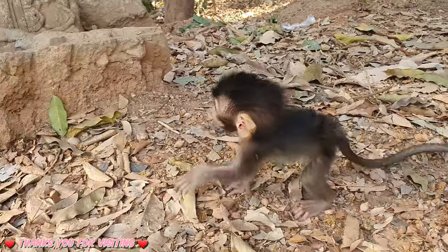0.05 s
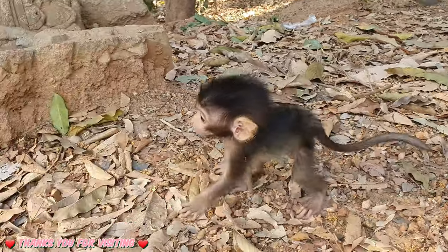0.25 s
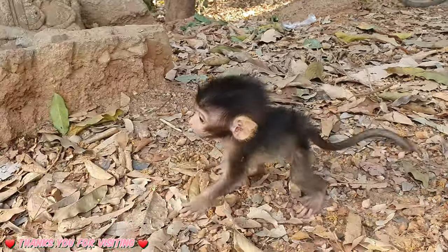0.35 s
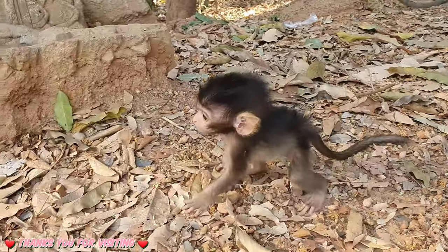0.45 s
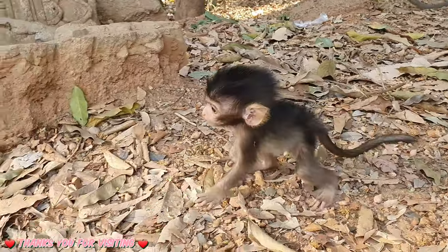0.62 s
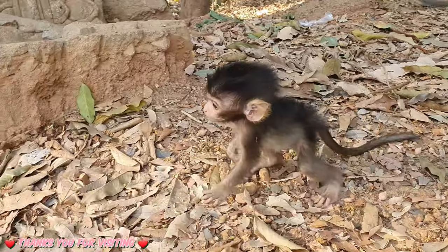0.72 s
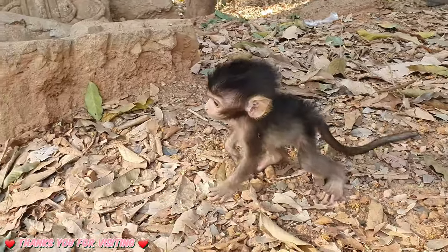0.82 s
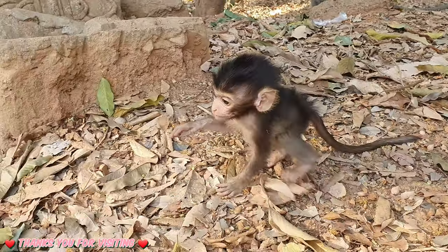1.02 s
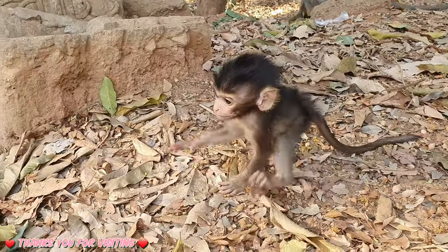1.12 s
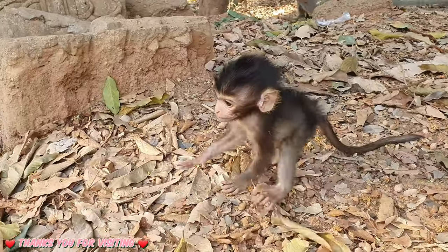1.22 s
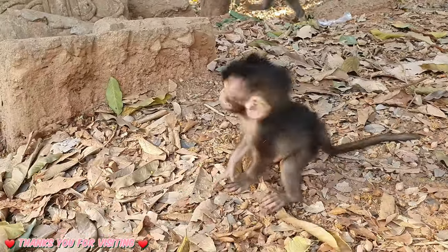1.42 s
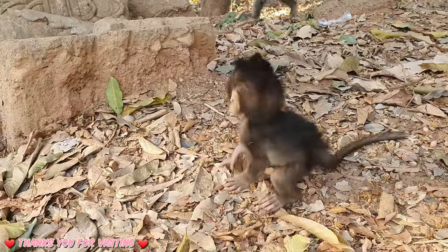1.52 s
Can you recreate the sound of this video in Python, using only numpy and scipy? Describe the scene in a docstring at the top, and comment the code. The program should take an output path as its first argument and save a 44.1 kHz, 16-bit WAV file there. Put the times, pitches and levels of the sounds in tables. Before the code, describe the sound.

Dry fallen leaves crunch close by as a small monkey scampers across them, lands with a louder crackle, then shuffles softly. Behind it are a faint outdoor hush and a slight rumble of air on the microphones.

```python
"""Baby monkey on dry leaves

Outdoors, a baby monkey scampers over fallen leaves, lands in one louder crunch, then shuffles lightly.
Each press of a paw breaks and rubs leaves in a dense shower of tiny cracks, with a few sharper snaps.
Air buffets the spaced microphone pair over a faint hush; the leaves lie nearer the left microphone."""
import sys
import numpy as np
from scipy import signal
from scipy.fft import rfft, irfft, next_fast_len
from scipy.io import wavfile

SR = 44100
rng = np.random.default_rng(int(sys.argv[2]) if len(sys.argv) > 2 else 0)


def to_wav(s):
    """Save 16-bit WAV."""
    ch = np.atleast_2d(s).T  # columns
    pcm = np.round(np.clip(ch, -1, 1) * 32767)  # PCM
    wavfile.write(sys.argv[1], SR, pcm.astype(np.int16))


N = 68355
T = np.arange(N) / SR

# paws pressing and dragging leaves: peak t/s, relative level/dB, rise/s, fall/s,
# low body/dB, mid weight/dB, papery upper mids/dB, leaf ring f/Hz, ring height/dB
PRESSES = [(0.084, -67.5, 0.0097, 0.0096, 0, 12, 4, 1035, 28),
           (.14, -69, 0.05, 0.047, 24, 19.5, 2, 1030, 12), (0.218, -34, 0.0058, 0.0067, -2, 0, 3, 1300, 5),
           (0.2301, -31.5, 0.0074, 0.0019, -8, 1, -1.5, 1980, 12.5),
           (0.292, -31, 0.018, 0.013, -8, 6, 3.5, 3670, 2),
           (.318, -31, 0.021, 0.027, -1.5, -0.5, 4, 1910, 11),
           (.399, -23.5, 0.023, 0.017, 0.5, 3.5, 4, 2070, 5),
           (0.446, -25, 0.01, 0.0115, 2.5, -3, 5.5, 1830, 13.5),
           (0.466, -31, 0.018, 0.037, -7.5, 1, 1.5, 2000, 5),
           (.535, -27.5, 0.03, 0.016, -4, -1.5, -0.5, 3500, 3),
           (0.597, -34, 0.035, 0.012, -9, 1, 4, 2530, 7), (0.628, -40.5, 0.14, 0.11, -1.5, 3.5, 2, 2500, 6),
           (0.717, -27.5, 0.0095, 0.031, -5, -4.5, -2, 2130, 12),
           (0.738, -26.5, 0.0031, 0.02, -2.5, -4, 3.5, 1160, 9),
           (0.77, -35, 0.025, 0.031, 2, 7, 5.5, 4200, -3.5), (.869, -47.5, .049, 0.094, -8, 6, .5, 1700, 6),
           (.935, -45, 0.033, 0.017, 4.5, 0.5, 7.5, 4600, 2),
           (1.079, -42, 0.0092, .008, -20, -6, 0, 4570, 10.5),
           (1.139, -43.5, 0.012, 0.021, 6, -4.5, 4, 2540, 12.5),
           (1.21, -47, 0.041, 0.015, 3, 1.5, 0.5, 4460, 6),
           (1.326, -51.5, 0.074, 0.054, 8.5, -4, 2, 4150, 3),
           (1.447, -51.5, 0.031, 0.041, 8, -3.5, 2, 2460, 9)]


def from_db(db):
    """Decibels to gain."""
    return 10 ** (np.asarray(db) / 20)


def unit_rms(x):
    """Scale to unit level."""
    return x / np.sqrt(np.mean(x ** 2) + 1e-20)


def in_time(rows):
    """A control curve at every sample."""
    return np.interp(T, *np.transpose(rows))


def wander(per_s):
    """A random curve gliding to a new value per_s times a second."""
    return np.interp(T * per_s, np.arange(1000), rng.standard_normal(1000))


def bands(colour):
    """Filter bank for a spectrum of unit power: (centre Hz, filter, gain) per band."""
    edges = np.r_[np.geomspace(22, 1400, 12, endpoint=False), np.geomspace(1400, 17000, 19)]
    centres = np.sqrt(edges[1:] * edges[:-1])
    hz, db = np.transpose(colour)
    gains = from_db(np.interp(np.log(centres), np.log(hz), db))
    gains /= np.sqrt(np.sum(gains ** 2 * np.diff(edges)) * 2 / SR)
    filters = [signal.butter(2, band, "band", fs=SR, output="sos") for band in zip(edges, edges[1:])]
    return zip(centres, filters, gains)


def noise(colour, likeness):
    """Coloured stereo noise of unit level; likeness is the correlation between the microphones."""
    out = 0
    for _, sos, gain in bands(colour):
        out += gain * signal.sosfilt(sos, rng.standard_normal((2, N + SR // 10)))[:, -N:]
    mid, side = out
    return unit_rms(np.sqrt(1 + likeness) * mid + np.sqrt(1 - likeness) * side * [[1], [-1]])


def hush():
    """The faint, smooth outdoor bed."""
    # spectrum of the hush: f/Hz, relative density/dB
    colour = [(60, 7.5), (170, -30), (280, 0), (400, 1.5), (600, 1.5), (850, -21.5), (1200, -8),
              (1700, -10), (2400, -7), (4000, -13), (5600, -12.5), (8000, -19), (12000, -7.5), (16000, -19)]
    # its slow drift: t/s, level/dB
    drift = [(0, -58.5), (.4, -59.5), (1.55, -57)]
    return from_db(in_time(drift)) * noise(colour, likeness=0.31)


def buffeting():
    """Air on the microphones: a lumpy low rumble, unrelated at the two and stronger on the right."""
    # gusts at the left microphone: t/s, level/dB
    gusts = [(0, -66.5), (.09, -56), (.19, -53.5), (.28, -57.5), (.40, -58), (.46, -44.5), (.51, -51.5),
             (.61, -45.5), (.67, -55), (.71, -51), (.77, -53.5), (.92, -53.5), (1.04, -54.5), (1.08, -55),
             (1.13, -56.5), (1.27, -52.5), (1.36, -51.5), (1.415, -57.5), (1.45, -52.5), (1.55, -54.5)]
    # spectrum of the rumble: f/Hz, relative density/dB
    colour = [(25, -23.5), (50, -5), (90, -3), (140, -11), (250, -13.5), (500, -34), (1000, -36)]
    return from_db(in_time(gusts)) * noise(colour, likeness=0) * from_db([[0], [6]])


def bumps():
    """Dull, brief thumps right at the microphones, a quarter cycle apart at the two."""
    # low thumps: t/s, relative level/dB, f/Hz, half-width/s
    thumps = [(0.362, -35, 71, 0.0083), (.452, -29.5, 148, 0.0021), (0.557, -30, 54, 0.013),
              (0.602, -29, 88, 0.0077), (0.62, -35, 55, 0.013), (0.758, -41, 59, 0.017),
              (0.847, -40.5, 48, 0.026), (1.003, -45.5, 94, 0.023), (1.153, -36.5, 87, 0.0079),
              (1.186, -32, 61, 0.0029), (1.238, -40.5, 63.4, 0.017), (1.267, -45, 60, 0.012),
              (1.376, -35, 140, 0.0045), (1.461, -35.5, 89, 0.011), (1.534, -45.5, 79.4, 0.062)]
    s, db, hz, width = np.transpose(thumps)[:, :, None]
    cycles = hz * (T - s) + rng.random((len(thumps), 1))
    swell = from_db(db) * np.exp(-((T - s) / width) ** 2)
    pair = [(swell * np.sin(2 * np.pi * cycles + shift)).sum(axis=0) for shift in (0, np.pi / 2)]
    return np.array(pair) * from_db([[-1.8], [1.8]])


def scatter(x, t60_s):
    """Earth bank and trees return a dying cloud of small reflections, different at each microphone."""
    t = T[:SR // 2]
    cloud = rng.standard_normal((2, len(t))) * from_db(-60 * t / t60_s)
    cloud /= np.sqrt(np.sum(cloud ** 2, axis=1, keepdims=True))
    return signal.fftconvolve(x, cloud, axes=1)[:, :N]


def spaced_pair(x):
    """Each crack comes from its own spot and reaches the right microphone later, a little louder."""
    # how much sooner the leaves reach the left microphone: t/s, lead/ms
    lead = [(.3, .487), (.46, .485), (.74, .46), (1.1, .465)]
    spread_ms, right_db = 0.011, 0.6
    lag_ms = np.abs(in_time(lead) + spread_ms * rng.standard_normal(N))
    arrival = np.arange(N) + np.round(lag_ms * SR / 1000).astype(int)
    right = from_db(right_db) * np.bincount(arrival, x)[:N]
    return np.array([x, right]) + 1e-18


def round_the_case(pair):
    """Bending round the recorder's case shifts the phase of each frequency at the right microphone."""
    # extra lag on the right: f/Hz, phase/rad
    case_shift = [(100, -0.37), (500, -1.06), (1000, -0.74), (1800, -0.82), (2500, -0.55), (3000, 0.61),
                  (4200, 0.51), (6300, -1.6), (9000, 0.12), (12000, -0.36), (15000, 0.53)]
    size = next_fast_len(N + SR // 10)
    shift = np.interp(np.arange(size // 2 + 1) * SR / size, *np.transpose(case_shift))
    right = irfft(rfft(pair[1], size) * np.exp(-1j * shift), size)[:N]
    return np.array([pair[0], right])


def snaps():
    """A brittle leaf breaks in about a millisecond: a broad crack with a high ring."""
    # single leaves snapping: t/s, relative level/dB, ring f/Hz
    breaks = [(0.21, -43, 14000), (0.2176, -45, 11700), (0.2291, -27.5, 12200), (.2560, -27.5, 12100),
              (0.2873, -42, 12400), (0.2936, -40, 12300), (0.357, -35, 12100), (0.36, -35, 12100),
              (.3789, -43, 12400), (0.3896, -25, 12200), (0.443, -21, 11900), (0.4507, -20, 10000),
              (0.469, -32, 11900), (.5266, -40, 13000), (0.5365, -24, 14000), (0.584, -28.5, 13000),
              (0.595, -31, 13000), (0.601, -25, 13200), (0.7202, -28, 11000), (0.7383, -21, 13000),
              (0.7481, -27, 11100), (0.7647, -31, 12200), (0.774, -38, 12500), (0.8089, -32, 12200),
              (0.948, -45, 4300), (.9780, -37, 12000), (1.0561, -37.5, 11700), (1.0745, -33.5, 11200),
              (1.0779, -41.5, 4500), (1.0840, -48, 4520), (1.1340, -37, 12100), (1.14, -39, 2760),
              (1.191, -39, 12000), (1.219, -38.5, 11900)]
    decay_s, ring_width_hz, crack_db = 0.00094, 2000, -3.5
    low_cut = signal.butter(2, 1500, "high", fs=SR, output="sos")
    out = 0
    for s, db, hz in breaks:
        tear = spaced_pair((T >= s) * np.exp(-np.abs(T - s) / decay_s) * rng.choice([-1, 1], N))
        resonance = signal.iirpeak(hz, hz / ring_width_hz, fs=SR)
        ring = np.sqrt(SR / (np.pi * ring_width_hz)) * signal.lfilter(*resonance, tear)
        crack = from_db(crack_db) * signal.sosfilt(low_cut, tear)
        out += from_db(db) * (ring + crack)
    return out


def paws():
    """Each press swells and dies away; gives the joint level and each press's share of the power."""
    s, db, rise, fall = np.transpose(PRESSES)[:4, :, None]
    swell = np.exp(-np.where(T < s, (s - T) / rise, (T - s) / fall))
    power = (from_db(db) * swell) ** 2 + 1e-18
    total = power.sum(axis=0)
    return np.sqrt(total), power / total


def press_colour(hz):
    """How much each press favours this frequency, in dB against the top sizzle."""
    ranges_hz = [640, 1680, 4220, 11000]   # body, weight, paper, sizzle
    return np.array([np.interp(np.log(hz), np.log(ranges_hz), [*press[4:7], 0]) for press in PRESSES])


def leaf_ring(shares):
    """The ring follows the pressing paw and strays as the leaves bend: pitch in Hz, height in dB."""
    hz, db = np.transpose(PRESSES)[7:]
    stray_octaves = 0.12 * wander(per_s=66)
    return 2 ** (np.log2(hz) @ shares + stray_octaves), db @ shares


def cracking(level):
    """Leaves crack faster and harder under pressure: a shower of clicks of uneven size."""
    full_press_db, full_cracks_per_s = -28, 5000
    rate = full_cracks_per_s * (level / from_db(full_press_db)) ** 0.45
    chance = np.minimum(rate / SR, 1)
    sizes = unit_rms(from_db(np.minimum(rng.exponential(1, N), 3.5)))
    return (rng.random(N) < chance) * sizes * level / np.sqrt(chance) * from_db(-1)


def litter_shiver(cracks, t60_s):
    """Each crack briefly shakes the neighbouring leaves; gives the envelope of that shiver."""
    decay = from_db(-120 / (t60_s * SR))   # power left after one sample
    return np.sqrt(signal.lfilter([1 - decay], [1, -decay], cracks ** 2 + 1e-18))


def leaves():
    """The crunch under the paws: cracks and their shiver, coloured by each press and each leaf."""
    # spectrum of breaking leaves: f/Hz, relative density/dB
    spectrum = [(150, -12), (240, -5), (400, -13), (700, -4), (1000, -16), (1300, -7), (1700, -9.5),
                (2300, -7.5), (2900, -11.5), (3600, -8.5), (4400, -10.5), (5200, -9.5), (6700, -9),
                (8100, -11), (9800, -5), (11900, 3), (14000, -2.5), (15800, -2.5)]
    crack_spread_db, ring_half_width_octaves = 3.5, 0.16
    level, shares = paws()
    cracks = cracking(level)
    shiver = from_db(-5) * litter_shiver(cracks, t60_s=0.012)
    ring_hz, ring_height_db = leaf_ring(shares)
    out = np.zeros((2, N))
    for hz, sos, gain in bands(spectrum):
        crack_gains = unit_rms(from_db(crack_spread_db * rng.standard_normal(N)))
        crack_gains *= rng.choice([-1, 1], N)
        ring_db = ring_height_db * np.exp(-(np.log2(hz / ring_hz) / ring_half_width_octaves) ** 2)
        leaf_db = 3.5 * wander(per_s=70)   # the colour changes from leaf to leaf
        colour = from_db(press_colour(hz) @ shares + ring_db + leaf_db)
        crunch = cracks * crack_gains + shiver * rng.standard_normal(N)
        out += gain * signal.sosfilt(sos, spaced_pair(crunch * colour))
    return out


def scene():
    """Nearby leaves and their scatter from farther off, with rumble, bumps and hush."""
    near = round_the_case(leaves() + snaps())
    reflections = from_db(-6.5) * scatter(near, t60_s=0.16)
    return near + reflections + buffeting() + bumps() + hush()


def record(dry):
    """A steep high cut on both channels."""
    cutoff_hz = 15650
    return signal.sosfilt(signal.ellip(12, .1, 80, cutoff_hz, fs=SR, output="sos"), dry)


dry = scene()
out = record(dry)
to_wav(out)
```